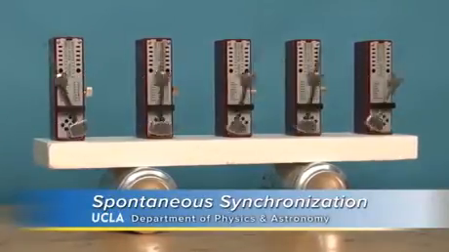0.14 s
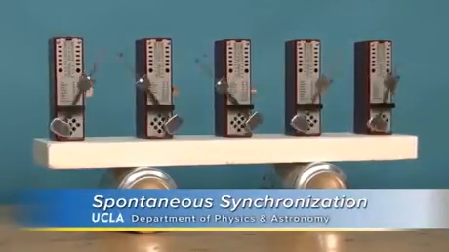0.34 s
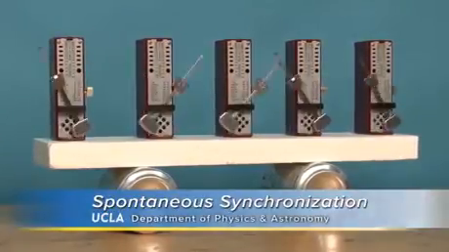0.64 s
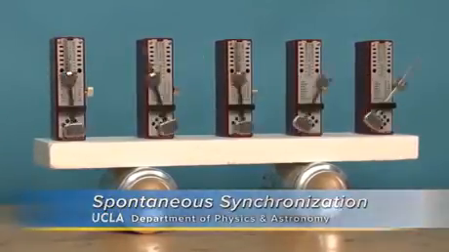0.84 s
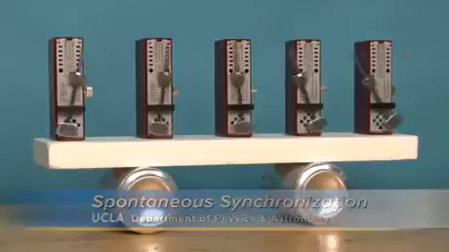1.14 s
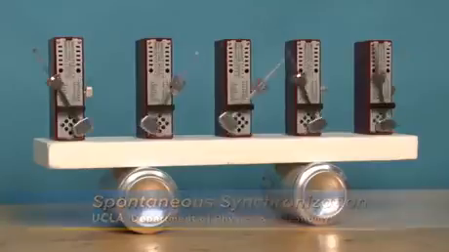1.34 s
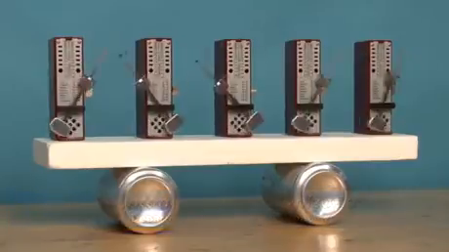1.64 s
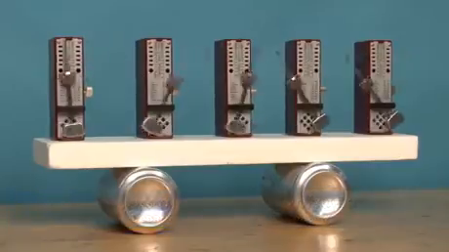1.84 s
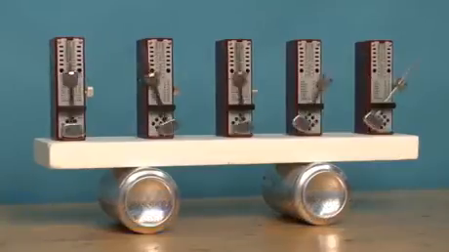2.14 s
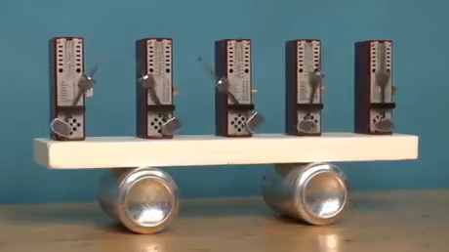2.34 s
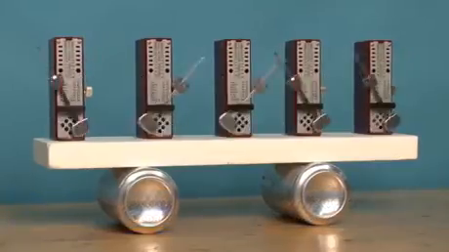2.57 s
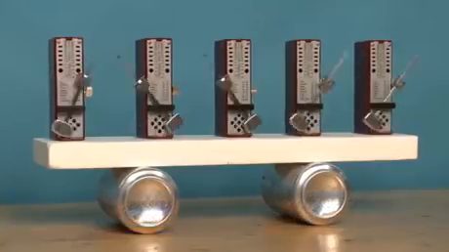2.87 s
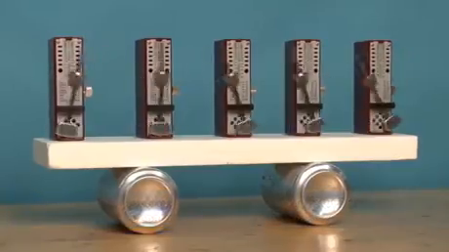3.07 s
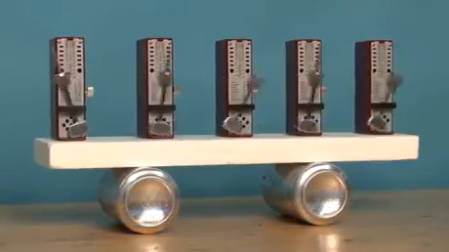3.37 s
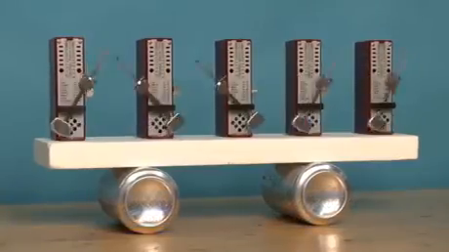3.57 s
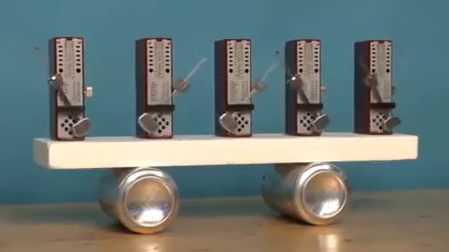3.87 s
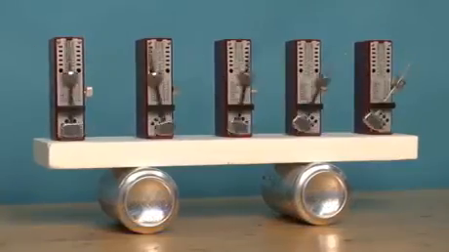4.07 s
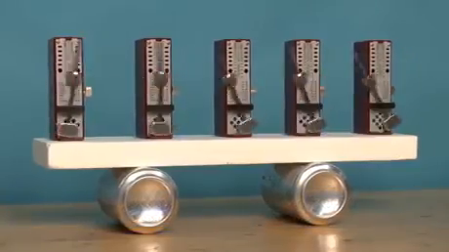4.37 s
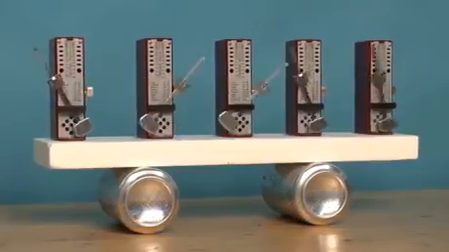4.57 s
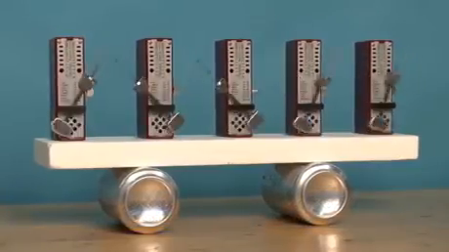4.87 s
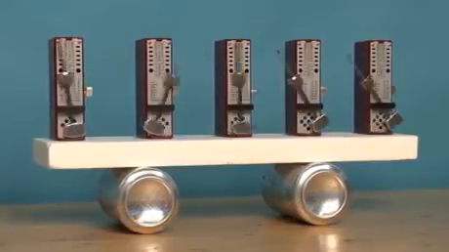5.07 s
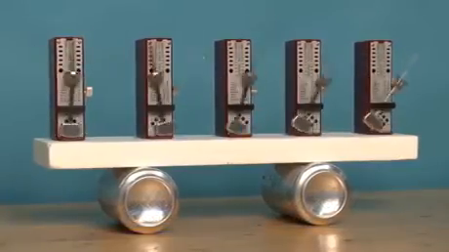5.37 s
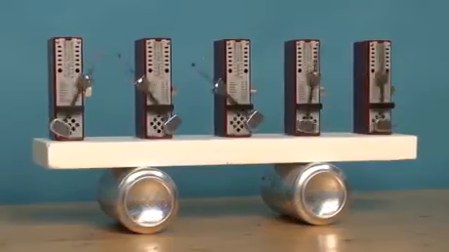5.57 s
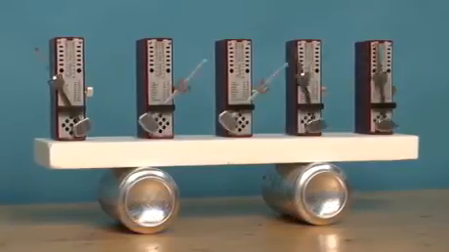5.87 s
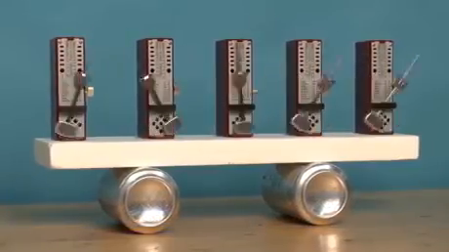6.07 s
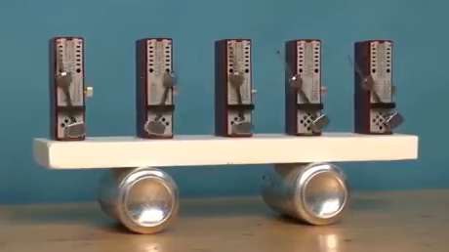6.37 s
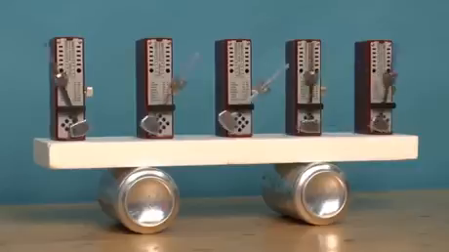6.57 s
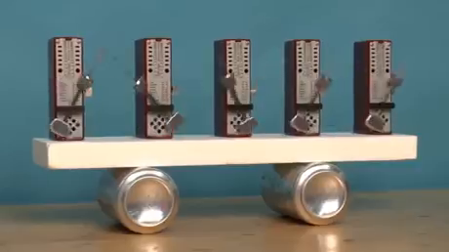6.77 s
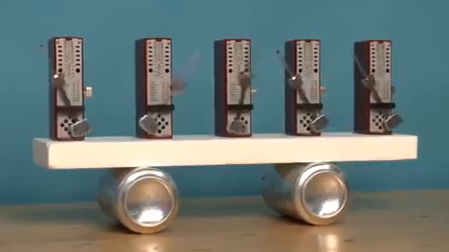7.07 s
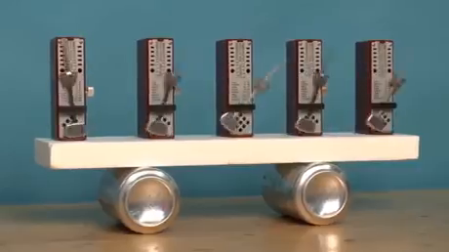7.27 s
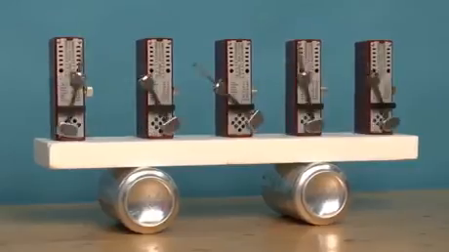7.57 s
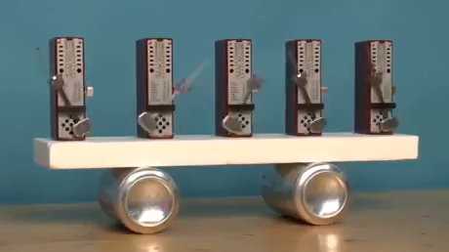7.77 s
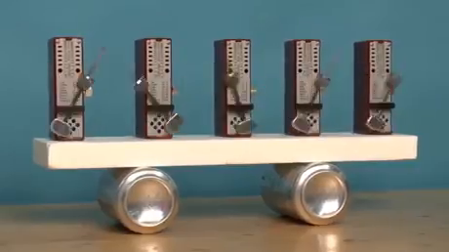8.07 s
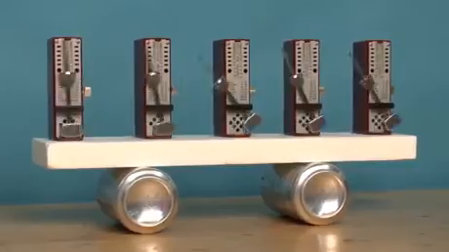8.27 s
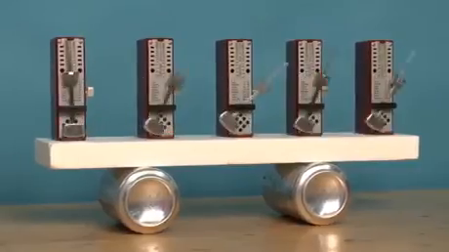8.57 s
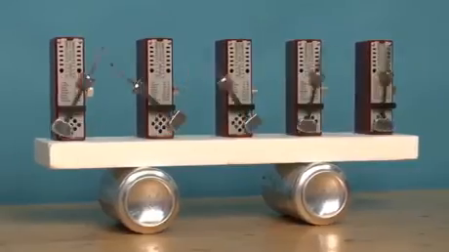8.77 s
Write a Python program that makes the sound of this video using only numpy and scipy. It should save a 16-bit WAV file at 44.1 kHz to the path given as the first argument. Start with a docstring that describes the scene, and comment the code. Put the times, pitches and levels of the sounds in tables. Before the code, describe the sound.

Five small clockwork metronomes are ticking from the start, centred in front of a stereo microphone in a small room. Each makes a dry, bright click about three times a second, with a slightly different plastic ring and no bass. They run at nearly the same speed but out of step, so the ticks fall in quick, uneven clusters whose pattern slowly shifts. A soft, dull rumble swells at the opening and dies away by about 1 second. A few ticks stand out slightly: sharper snaps near 2.5, 3.6, 4.2 and 4.4 seconds, and fuller clacks near 5.2, 7.5 and 8.1 seconds. Every tick has short, close echoes from the table and walls. Faint room air and a low electrical hum lie underneath, a little to the right. The clatter carries on at an even level to the end, at about 9 seconds.

```python
"""Five small clockwork metronomes tick straight ahead of a stereo microphone in a small room.
They stand on a board that rests on two cans. Each escapement knocks its own plastic case about three
times a second; the pendulums drift against each other, so the ticks arrive in shifting clusters, direct
and off the table and walls. Behind them, leaning right, lie still air, a mains hum and a dull rumble
that dies away in the first second."""
import sys
import numpy as np
from scipy import signal
from scipy.fft import rfft, irfft, next_fast_len
from scipy.io import wavfile
from scipy.ndimage import uniform_filter1d

SR = 44100
rng = np.random.default_rng(int(sys.argv[2]) if len(sys.argv) > 2 else 0)


def dump(signal):
    """Clip the signal to [-1, 1] and save it as 16-bit WAV at the path in sys.argv[1]."""
    limited = np.clip(np.atleast_2d(signal).T, -1, 1)
    pcm = np.round(limited * 32767).astype(np.int16)
    wavfile.write(sys.argv[1], SR, pcm)


N = 392931

# still air of the room: f/Hz, relative level/dB per Hz
AIR_SPECTRUM = [(20, -5), (50, -6.5), (80, -2.5), (120, -0.5), (160, 5), (220, -0.5), (330, -3.5),
                (500, -11), (750, -15), (1000, -27), (2000, -17), (5000, -28), (10000, -34.5), (16000, -50)]
# left-right likeness of air and rumble at the microphone: f/Hz, likeness/0-1
NOISE_LIKENESS = [(30, 0.3), (120, .85), (280, 0.62), (450, 0.64), (700, .4), (3000, 1), (12000, 1)]
# mains hum and the low tones beside it: f/Hz, level/dB
HUM_TONES = [(120, -63.5), (180, -78), (240, -77), (296, -80), (356, -78.5), (721, -84.5)]
# colour of the opening rumble: f/Hz, relative level/dB per Hz
RUMBLE_SPECTRUM = [(30, -24), (70, -10), (130, -6), (200, -1), (370, -5), (470, -9.5), (620, -10.5),
                   (850, -25), (1200, -28), (3000, -51)]
# its swells: start t/s, length t/s, level/dB
SWELLS = [(-0.1, 0.11, -49.5), (0.19, 0.3, -56), (0.44, 0.06, -63)]
# late decay of the room: f/Hz, t60/s
ROOM_DECAY = [(500, 0.51), (1400, .32), (3000, 0.36), (7000, 0.23), (14000, 0.26)]
# stereo width of the echoes: f/Hz, side minus mid level/dB
ROOM_WIDTH = [(450, 2.5), (750, -5), (1250, -5.5), (2000, -10), (3300, -21), (5500, -27), (9000, -48),
              (15000, -23)]
# pendulums A to E; a limp makes the tick late and the tock early: first beat t/s, beat length t/s,
# drift swing t/s, furthest behind at t/s, mean limp t/s, limp swing t/s, most limp at t/s
PENDULUM_TIMING = [(0.2083, 0.32376, 0.0136, 4.06, 0.0, 0.001704, 1.403),
                   (0.263, 0.32269, 0.0134, 6.03, 0.0026, 0.0022, 6.4),
                   (0.291, 0.32667, 0.0234, 15.31, -0.0007, 0.001398, 0.7),
                   (0.0024, 0.32725, 0.0182, 13.22, -0.0002, 0.0014, 6.6),
                   (0.0536, 0.32211, 0.006, 11.34, 0.0022, 0.0027, 3.6)]
# knocks that stand out as a sharp snap or a full clack: t/s, metronome, extra level/dB, extra treble/dB
ACCENTED_KNOCKS = [(2.486, "A", -3.5, 9), (3.587, "E", -1.5, 4), (4.240, "D", -2, 4.5), (4.430, "A", 0, 4),
                   (5.209, "E", 2, -2.5), (7.457, "C", 2, -5), (8.109, "E", 1.5, -3)]
# crack of the works, their many short modes taken together: f/Hz, relative level/dB of A, B, C, D, E
CRACK_SPECTRA = [(625, -25.5, -25, -30.5, -26, -36), (1110, -39, -32.5, -23, -29, -23.5),
                 (1840, -18, -18, -16, -8, -24), (2980, -13, -15, -11, -13.5, -16.5),
                 (4960, -14.5, -13, -16, -16, -14), (6850, -12.5, -16, -12, -15, -16),
                 (9130, -26, -25.5, -22.5, -23.5, -22.5), (11730, -31.5, -29, -30, -29, -28),
                 (15000, -33.5, -33.5, -36, -37, -33.5)]
# modes of each plastic case: f/Hz, t60/s, relative level/dB towards the microphone and into the room
MODES_A = [(783, 0.059, -59.5, -61), (1070, 0.037, -55.5, -58), (1290, 0.024, -56.5, -56.5),
           (1658, 0.073, -58.5, -63), (1990, 0.018, -43.5, -41), (2425, 0.04, -44.5, -48),
           (2887, 0.018, -36, -44), (3182, 0.057, -42, -46), (3706, 0.024, -34, -40),
           (4093, 0.032, -37.5, -35), (4700, 0.048, -49.5, -51.3), (5300, 0.025, -43.5, -39),
           (6060, 0.028, -43.5, -61), (7060, 0.027, -50, -44), (8100, 0.017, -52, -52),
           (8600, 0.029, -62, -60), (8800, 0.026, -64, -52), (10200, 0.026, -52.5, -56)]
MODES_B = [(736, 0.057, -63, -62), (1390, 0.018, -47, -55), (1640, 0.029, -71, -74),
           (1985, 0.017, -40, -38), (2237, 0.037, -45, -51), (2720, 0.011, -33, -33.5),
           (3150, 0.031, -41.5, -49), (3690, 0.023, -31.5, -47), (4010, 0.011, -33, -30),
           (4070, 0.013, -44, -46), (4540, 0.02, -50, -59), (4890, 0.043, -45.5, -49),
           (5370, 0.011, -41, -39), (5820, 0.0057, -27, -34), (6800, 0.022, -41.5, -52),
           (7250, 0.029, -58, -49), (7600, 0.028, -50.5, -47), (9620, 0.019, -57, -63)]
MODES_C = [(732, 0.027, -63, -50.5), (1400, 0.02, -41, -48), (1650, 0.042, -55, -64),
           (2111, 0.017, -25, -34), (2718, 0.018, -34, -33), (2835, 0.053, -45.5, -53),
           (3395, 0.011, -33, -44), (3946, 0.03, -36.5, -39.5), (4300, 0.013, -54, -40),
           (4500, 0.025, -59, -49), (4704, 0.027, -45.2, -39.5), (5330, 0.022, -51, -49),
           (5552, 0.018, -40, -38.5), (5630, 0.038, -47, -55), (6224, 0.0073, -42.7, -51),
           (6960, 0.01, -39, -45), (7270, 0.025, -57, -54), (8250, 0.02, -58, -56)]
MODES_D = [(738, 0.054, -52, -58.5), (1176, 0.034, -49.5, -48.5), (1435, 0.043, -42, -52),
           (1665, 0.048, -54, -51), (2010, 0.02, -27.5, -35), (2625, 0.0062, -30, -31),
           (3630, 0.0051, -25, -27.5), (4044, 0.044, -39, -53.5), (4346, 0.035, -44, -45.5),
           (4540, 0.015, -44, -41.5), (4930, 0.027, -67, -57), (5264, 0.022, -38.5, -50),
           (5690, 0.016, -49, -40), (5900, 0.022, -44, -47), (6370, 0.018, -42.1, -46),
           (6830, 0.025, -53, -51), (6910, 0.031, -47, -47), (7259, 0.026, -65, -67)]
MODES_E = [(527, 0.005, -55, -40.5), (780, 0.031, -67, -61), (1370, 0.04, -62, -62),
           (2085, 0.009, -32, -31), (2734, 0.012, -30.5, -34.5), (3140, 0.016, -64, -39.5),
           (3460, 0.01, -34, -51), (3913, 0.017, -31, -35), (4600, 0.035, -64, -49.3),
           (5320, 0.019, -37.5, -37), (5590, 0.017, -51, -42.5), (6063, 0.01, -25.5, -34.5),
           (7000, 0.018, -42, -43.5), (7180, 0.024, -44.5, -47), (7600, 0.016, -55, -42),
           (8120, 0.015, -44.5, -47), (8960, 0.01, -49, -44), (10100, 0.021, -52.5, -55)]


def from_db(db):
    """Decibels to gain."""
    return 10 ** (np.asarray(db) / 20)


def at_hz(points, hz):
    """Read a table of f/Hz, value on a log-frequency axis."""
    points = np.array(points)
    return np.interp(np.log(np.maximum(hz, 1)), np.log(points[:, 0]), points[:, 1])


def dying(t, t60):
    """Amplitude that falls 60 dB in t60."""
    return np.exp(-np.log(1000) * t / t60)


def coloured(x, spectrum):
    """Shape a sound by a table of f/Hz, level/dB."""
    length = x.shape[-1]
    size = next_fast_len(length)
    gain = from_db(at_hz(spectrum, np.fft.rfftfreq(size, 1 / SR)))
    return irfft(rfft(x, size) * gain, size)[..., :length]


def causal_filter(spectrum, size=512):
    """Minimum-phase impulse response for a table of f/Hz, level/dB: nothing sounds before the blow."""
    gain = from_db(at_hz(spectrum, np.fft.rfftfreq(size, 1 / SR)))
    cepstrum = irfft(np.log(gain))
    cepstrum[1:size // 2] *= 2
    cepstrum[size // 2 + 1:] = 0
    return irfft(np.exp(rfft(cepstrum)))


def highpass(x, hz, order=2):
    """Butterworth low cut."""
    return signal.sosfilt(signal.butter(order, hz, "high", fs=SR, output="sos"), x)


def blend(steady, changing, share):
    """Mix two unrelated sounds at constant power."""
    return np.sqrt(1 - share) * steady + np.sqrt(share) * changing


def add(out, sound, at_s):
    """Mix in a stereo sound; it may overhang either end."""
    start = int(round(at_s * SR))
    first, last = max(start, 0), min(start + sound.shape[1], N)
    out[:, first:last] += sound[:, first - start:last - start]


def room_noise(spectrum):
    """Steady noise around the microphone, widest in the deep bass, nearly mono in the treble; rms 1."""
    mid, side = rng.standard_normal((2, N))
    likeness = [(hz, np.clip(alike, 0, .99)) for hz, alike in NOISE_LIKENESS]
    mid = coloured(mid, [(hz, 10 * np.log10(1 + alike)) for hz, alike in likeness])
    side = coloured(side, [(hz, 10 * np.log10(1 - alike)) for hz, alike in likeness])
    noise = coloured(mid + side * [[1], [-1]], spectrum)
    return noise / np.sqrt(np.mean(noise ** 2) + 1e-20)


def mains_hum(waver_db=.5):
    """Steady low tones in the room, each wavering a little in level."""
    t, out = np.arange(N) / SR, 0
    for hz, level_db in HUM_TONES:
        waver = np.interp(t, np.linspace(0, t[-1], 40), rng.standard_normal(40))
        tone = np.sqrt(2) * np.sin(2 * np.pi * (hz * t + rng.random()))
        out = out + from_db(level_db + waver_db * waver) * tone
    return out


def rumble(attack_s=.03, t60=.55, tone_hz=810, tone_db=-69, tone_at_s=0.46, tone_width_s=0.15):
    """A dull rush that comes in swells and dies away, with a faint tone on its last crest."""
    t, envelope = np.arange(N) / SR, 0
    for start_s, length_s, level_db in SWELLS:
        rise = np.clip((t - start_s) / attack_s, 0, 1)
        fall = dying(np.maximum(t - start_s - length_s, 0), t60)
        envelope = envelope + from_db(level_db) * rise * fall
    crest = np.exp(-((t - tone_at_s) / tone_width_s) ** 2)
    tone = from_db(tone_db) * crest * np.sin(2 * np.pi * tone_hz * t)
    return envelope * room_noise(RUMBLE_SPECTRUM) + tone


def scatter(envelope, passes=4):
    """Dense random echoes under an envelope, evened out so that they favour no pitch; energy 1."""
    x = rng.standard_normal(len(envelope))
    for _ in range(passes):
        spectrum = rfft(x * envelope)
        x = irfft(spectrum / (np.abs(spectrum) + 1e-12), len(x))
        local_power = np.abs(uniform_filter1d(x * x, size=64))
        x = x / np.sqrt(local_power + 1e-20)
    return x * envelope / np.linalg.norm(x * envelope)


def room_response(gap_s=0.002, build_s=0.00357, early_t60=0.092, late_share=0.2):
    """One path to the microphone: close echoes off table and wall, then a tail whose treble dies first."""
    t = np.arange(SR // 2) / SR
    onset = np.clip((t - gap_s) / build_s, 0, 1)
    tail = dying(t, at_hz(ROOM_DECAY, 3000))
    echoes = scatter(onset * np.sqrt(dying(t, early_t60) ** 2 + late_share * tail ** 2))
    out = 0
    # peel off bands from the bass upwards and give each its own decay
    for (hz, t60), (next_hz, _) in zip(ROOM_DECAY, ROOM_DECAY[1:]):
        lowpass = signal.butter(2, np.sqrt(hz * next_hz), fs=SR, output="sos")
        band = signal.sosfiltfilt(lowpass, echoes)
        out = out + band * dying(t, t60) / tail
        echoes = echoes - band
    return out + echoes * dying(t, ROOM_DECAY[-1][1]) / tail


def stereo_room():
    """The room from the microphone's place: wide in the bass, narrow in the treble."""
    return room_response() + coloured(room_response(), ROOM_WIDTH) * [[1], [-1]]


def pendulum(which, treble_db, ahead_treble_db, drift_cycle_s=20, limp_cycle_s=11):
    """Knocks (t/s, level/dB, treble/dB) of a pendulum that lags and catches up on the rolling board."""
    timing = PENDULUM_TIMING["ABCDE".index(which)]
    first_s, beat_s, drift_s, behind_at_s, mean_limp_s, limp_swing_s, limp_at_s = timing
    beat = np.arange(int((N / SR - first_s) / beat_s) + 1)
    even_s = first_s + beat_s * beat
    behind = np.cos(2 * np.pi * (even_s - behind_at_s) / drift_cycle_s)
    limp_s = mean_limp_s + limp_swing_s * np.cos(2 * np.pi * (even_s - limp_at_s) / limp_cycle_s)
    knock_s = even_s + drift_s * behind + limp_s * (-1) ** beat
    chance_db, chance_treble_db = (rng.standard_normal((len(beat), 2)) * [.3, .67]).T
    bright_db = chance_treble_db + treble_db - ahead_treble_db * behind
    knocks = np.column_stack([knock_s, chance_db, bright_db])
    for accent_s, name, extra_db, extra_treble_db in ACCENTED_KNOCKS:
        if name == which:
            knocks[np.argmin(np.abs(knock_s - accent_s)), 1:] += extra_db, extra_treble_db
    return knocks


def bounce(x, lap_s=.0007, keep=.62):
    """The blow runs to and fro between works and case, spreading the click without colouring it."""
    loop = np.concatenate([[1], np.zeros(int(lap_s * SR) - 1), [-keep]])
    return signal.lfilter(loop[::-1], loop, x)


def metronome(which, case, rooms, knocks, direct_db, room_db, crack_db, crack_t60, pan_db,
              pallet_db=1.22, uneven_db=1.13, case_rise_s=0.00057, crack_rise_s=0.00066,
              crack_room_db=2.4, treble_hz=4500):
    """Two pallets knock the case in turn; its ring and the works' crack reach microphone and room."""
    t = np.arange(SR // 8) / SR
    hz, t60, front_db, around_db = np.transpose(case)
    polarity = (-1) ** np.arange(len(hz))[:, None]
    modes = polarity * np.sin(2 * np.pi * hz[:, None] * t) * dying(t, t60[:, None])
    modes *= 1 - np.exp(-t / case_rise_s)   # the blow takes a moment to spread into the case
    crack_colour = causal_filter(np.array(CRACK_SPECTRA)[:, [0, 1 + "ABCDE".index(which)]])
    burst = (1 - np.exp(-t / crack_rise_s)) * dying(t, crack_t60)
    works, home_room = scatter(burst), stereo_room()
    touch_db = pallet_db * rng.standard_normal((2, len(hz)))   # each pallet meets the modes its own way
    direct_gain = from_db(direct_db + pan_db * np.array([[.5], [-.5]]))
    out = np.zeros((2, N))
    for beat, (knock_s, strength_db, treble_db) in enumerate(knocks):
        rattle = blend(works, scatter(burst), share=.3)   # no two blows rattle the works alike
        crack = signal.fftconvolve(rattle, crack_colour)[:len(t)]
        blow_db = touch_db[beat % 2] + uneven_db * rng.standard_normal(len(hz))
        direct = bounce(from_db(front_db + blow_db) @ modes) + from_db(crack_db) * crack
        around = from_db(around_db + blow_db) @ modes + from_db(crack_room_db) * crack
        # the board rolls to and fro, so the echoes shift from tick to tick
        room = blend(home_room, rooms[rng.integers(len(rooms))], share=.7)
        tick = from_db(room_db) * signal.fftconvolve(room, around[None], axes=1)
        tick[:, :len(t)] += direct_gain * direct
        # a harder contact is brighter
        tick += (from_db(treble_db) - 1) * highpass(tick, treble_hz, order=1)
        add(out, from_db(strength_db) * tick, knock_s)
    return out


def scene(air_db=-65.5, left_db=-2.5, right_db=1.44, case_low_hz=380):
    """Five metronomes straight ahead of the microphone; the low background leans to the right."""
    rooms = [stereo_room() for _ in range(12)]
    ticking = (
        metronome("A", MODES_A, rooms, pendulum("A", treble_db=-0.5, ahead_treble_db=0.4),
                  direct_db=-0.7, room_db=-1.4, crack_db=1.7, crack_t60=0.0253, pan_db=0.5)
        + metronome("B", MODES_B, rooms, pendulum("B", treble_db=-0.4, ahead_treble_db=-0.3),
                    direct_db=-0.3, room_db=-0.7, crack_db=2.0, crack_t60=0.023, pan_db=-0.6)
        + metronome("C", MODES_C, rooms, pendulum("C", treble_db=-2.4, ahead_treble_db=0.9),
                    direct_db=-0.4, room_db=-0.3, crack_db=0.3, crack_t60=0.017, pan_db=0.8)
        + metronome("D", MODES_D, rooms, pendulum("D", treble_db=-1.4, ahead_treble_db=0.3),
                    direct_db=-1.3, room_db=-0.9, crack_db=0.8, crack_t60=0.0198, pan_db=0.7)
        + metronome("E", MODES_E, rooms, pendulum("E", treble_db=-0.55, ahead_treble_db=-0.55),
                    direct_db=-0.5, room_db=-1.1, crack_db=2.5, crack_t60=0.0232, pan_db=0.8))
    ticking = highpass(ticking, case_low_hz)   # small cases radiate no bass
    background = from_db(air_db) * room_noise(AIR_SPECTRUM) + mains_hum() + rumble()
    return ticking + background * from_db([[left_db], [right_db]])


def record(dry):
    """The microphone signal is cut steeply above 16 kHz."""
    return signal.sosfilt(signal.ellip(10, .2, 80, 16000, fs=SR, output="sos"), dry)


dry = scene()
out = record(dry)
dump(out)
```